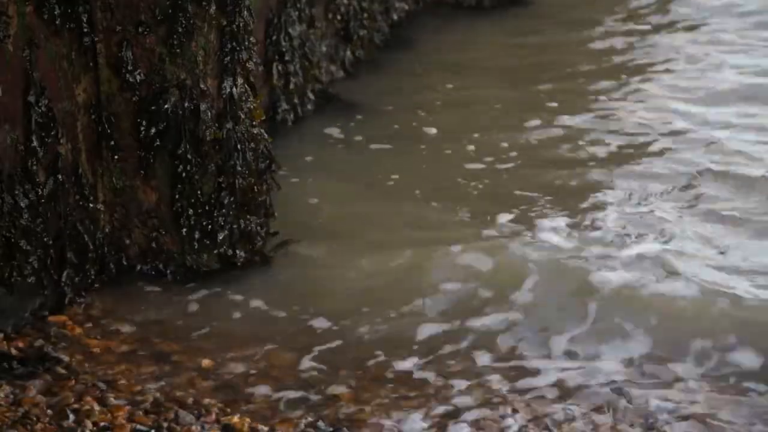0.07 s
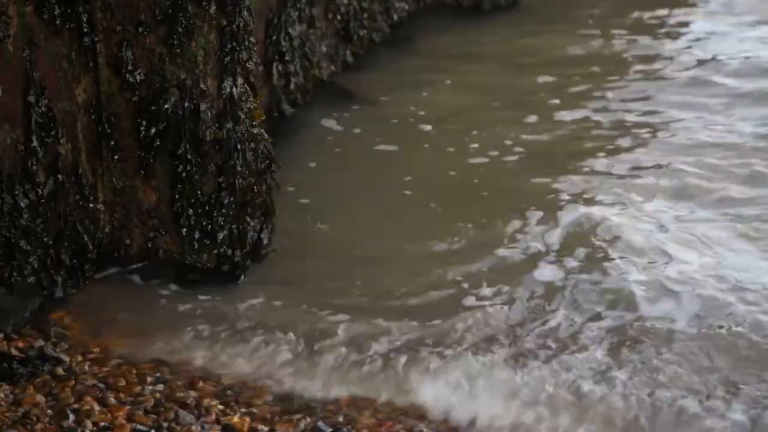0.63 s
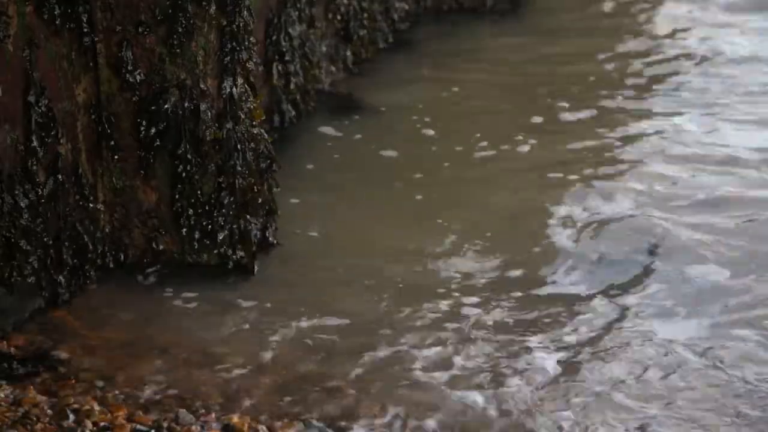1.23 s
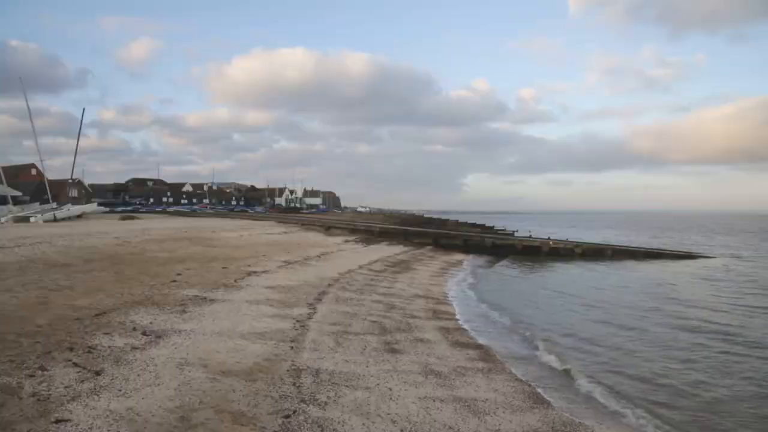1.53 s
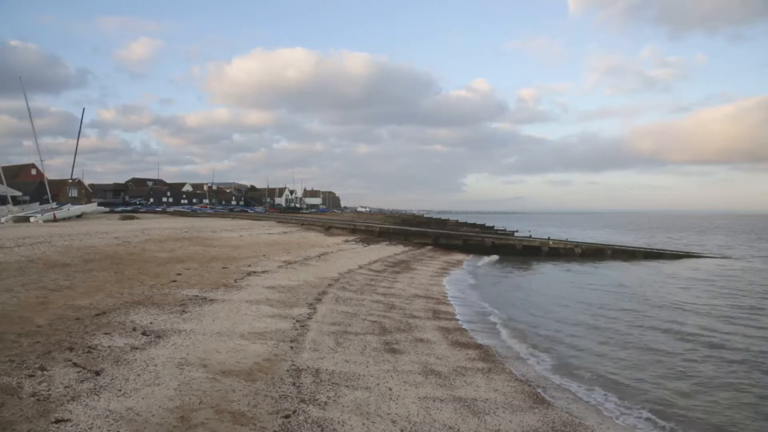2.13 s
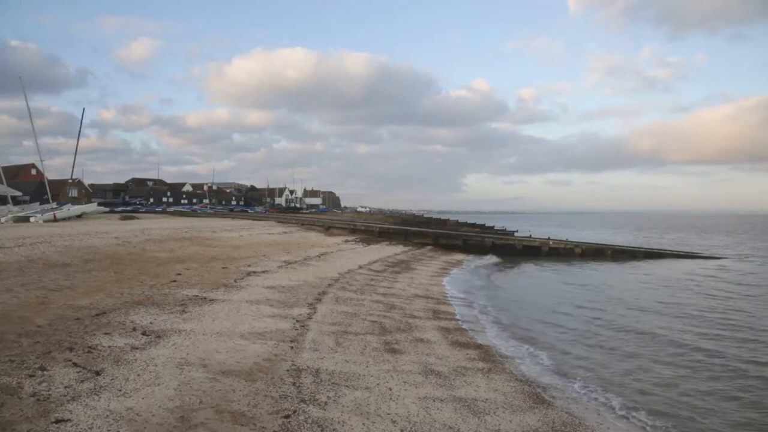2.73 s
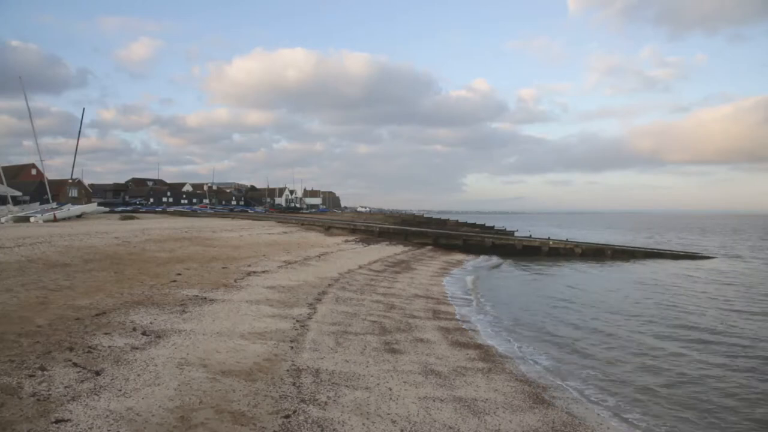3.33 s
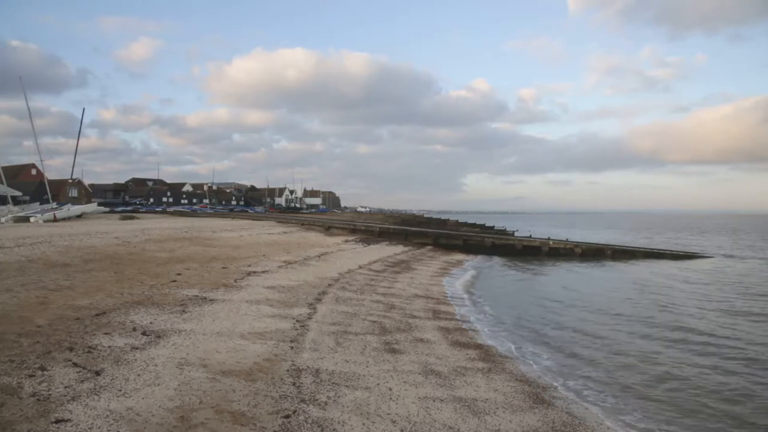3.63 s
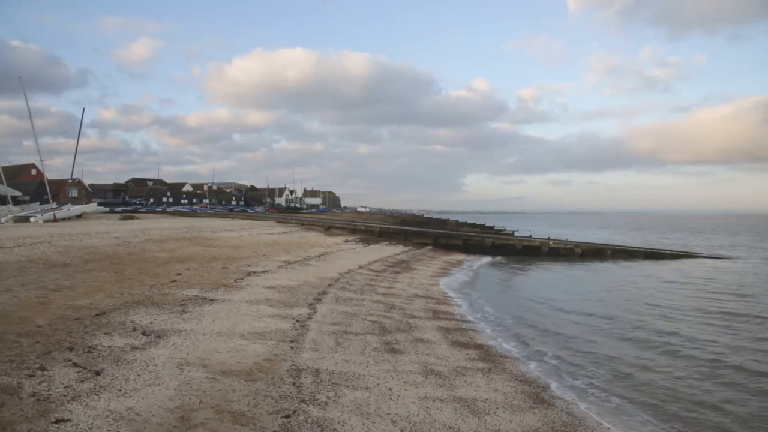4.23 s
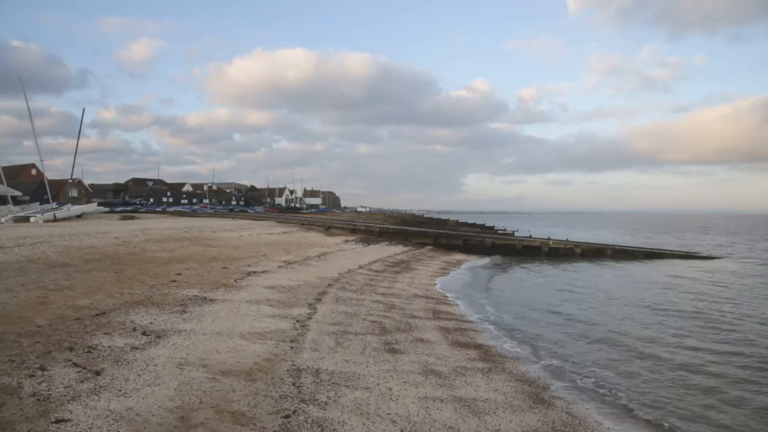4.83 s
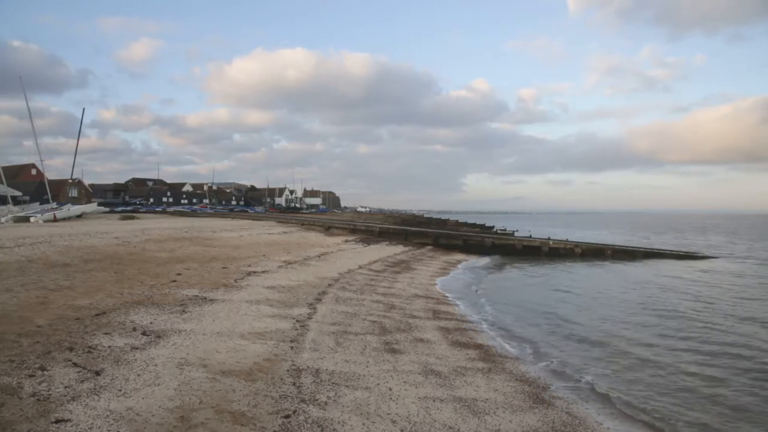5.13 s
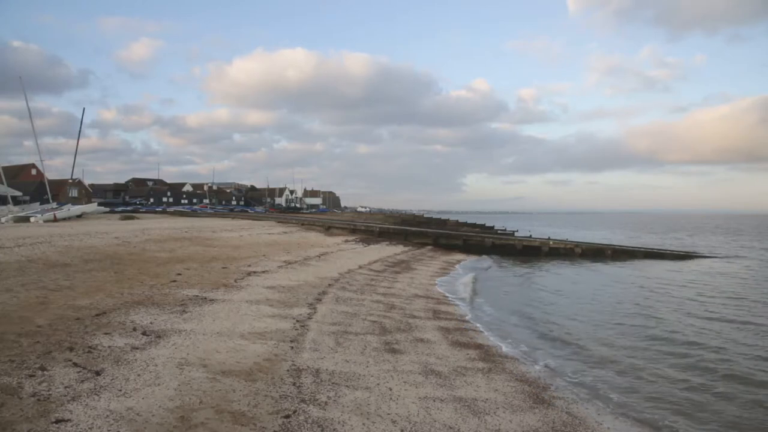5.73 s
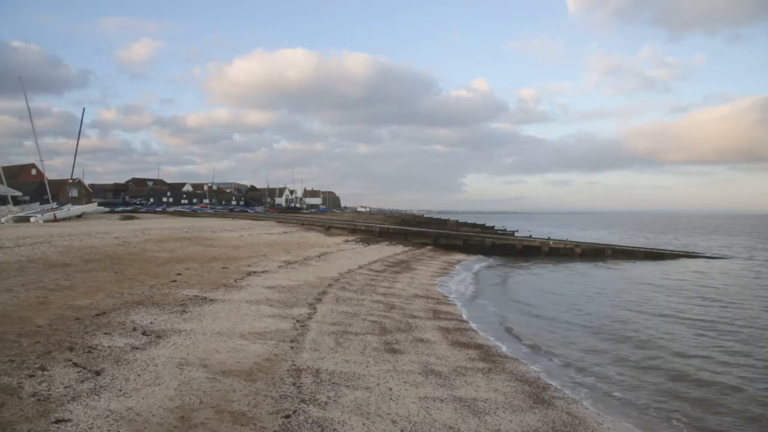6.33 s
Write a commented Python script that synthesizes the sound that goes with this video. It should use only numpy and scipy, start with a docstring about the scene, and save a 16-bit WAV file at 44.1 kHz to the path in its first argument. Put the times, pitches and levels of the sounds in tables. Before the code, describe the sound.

A small wave breaks and fizzes against a wooden breakwater, then ripples lap a pebble beach in light wind until another wave spills.

```python
"""Small sea waves on a pebble beach. First one breaks beside a wooden breakwater: foam fizzes, bubbles wash in,
air pockets churn and gulp, and the sound fades out. It fades in on the open shore, where ripples lap and plop,
pebbles rattle and light gusts buffet the microphone, until a second wave spills over the shingle. The water
sounds chiefly by bubble resonance: trapped air rings as a damped oscillator, the lower the larger the bubble."""
import sys
import numpy as np
from scipy import signal
from scipy.fft import rfft, irfft, next_fast_len
from scipy.io import wavfile
from scipy.ndimage import uniform_filter1d

SR = 44100
rng = np.random.default_rng(int(sys.argv[2]) if len(sys.argv) > 2 else 0)


def to_wav(s):
    """Save 16-bit WAV."""
    ch = np.atleast_2d(s).T  # columns
    pcm = np.round(np.clip(ch, -1, 1) * 32767)  # PCM
    wavfile.write(sys.argv[1], SR, pcm.astype(np.int16))


N = 280917
TIME = np.arange(N) / SR
SCENE_CHANGE_S = 1.553   # the silent instant between breakwater and open shore

# spectral envelope of bursting foam: frequency_hz, gain_db
FOAM_SPECTRUM = [(900, -13), (2000, 4), (3100, 6.5), (4200, 2), (5500, -1), (7500, -4), (10000, -9),
                 (13000, -12.5), (15700, -15)]


def from_db(db):
    """Decibels to amplitude ratio."""
    return 10 ** (np.asarray(db) / 20)


def rms_one(x):
    """Normalisation to rms 1."""
    return x / np.sqrt(np.mean(x ** 2) + 1e-20)


def drift(rate):
    """Low-pass noise: a slow random fluctuation with rms near 1."""
    r = np.exp(-80 * np.pi * rate / SR)
    slow = signal.lfilter([1], [1, -2 * r, r * r], rng.standard_normal(N // 40 + 2002))[2000:]
    return np.interp(np.arange(N) / 40, np.arange(len(slow)), rms_one(slow))


def coloured(x, spectrum):
    """Minimum-phase filtering imposes a spectral envelope causally; rms 1."""
    size = 2 * next_fast_len(N)
    hz, db = np.transpose(spectrum)
    bins_hz = np.maximum(np.arange(size // 2 + 1) * SR / size, 1)
    gain = from_db(np.interp(np.log(bins_hz), np.log(hz), db))
    cepstrum = irfft(np.log(gain))
    response = np.exp(2 * rfft(cepstrum[:size // 2], size))
    return rms_one(irfft(rfft(x, size) * response)[:N])


def evened(x, seconds):
    """Division by the running rms steadies the level and keeps the finer grain."""
    power = np.abs(uniform_filter1d(x ** 2, max(int(seconds * SR), 2)))
    return x / np.sqrt(power + 1e-12)


def resonance(x, hz, width_hz):
    """A damped oscillator: two poles, gain 1 at the peak."""
    r = np.exp(-np.pi * width_hz / SR)
    feedback = [1, -2 * r * np.cos(2 * np.pi * hz / SR), r * r]
    return signal.lfilter(np.array([1, 0, -1]) * (1 - r * r) / 2, feedback, x + 1e-18)


def impulses(per_s, spread_db):
    """A Poisson process of clicks, many small and a few large."""
    sizes = from_db(spread_db * np.minimum(rng.exponential(1, N), 4.5))
    return sizes * rng.choice([-1, 1], N) * (rng.random(N) < per_s / SR)


def bubbles(clicks, low_hz, high_hz, q, count=24):
    """Minnaert resonance: each click rings one bubble, whose random size sets its pitch; rms 1."""
    size_class = rng.integers(0, count, N)
    pitches = np.geomspace(low_hz, high_hz, count)
    return rms_one(sum(resonance(clicks * (size_class == k), hz, hz / q) for k, hz in enumerate(pitches)))


def water(grains, spectrum, blur_db, flutter_db, flutter_rate):
    """Superposition: near grains over the Gaussian blur of far ones, fluttering as the water tumbles."""
    near = rms_one(evened(grains, seconds=0.66))
    far = from_db(blur_db) * rng.standard_normal(N)
    steady = evened(coloured(near + far, spectrum), seconds=0.12)
    return steady * from_db(flutter_db * drift(flutter_rate))


def far_sea():
    """Incoherent addition: surf along the rest of the shore merges into a steady hush."""
    # spectral envelope of distant surf: frequency_hz, gain_db
    spectrum = [(40, 20), (100, 7), (200, 8.5), (400, -4), (1000, -33.5), (2000, -22), (3100, -6),
                (4200, -31), (8000, -26), (15700, -22)]
    return from_db(-53) * coloured(rng.standard_normal(N), spectrum)


def wind(breeze_db):
    """Turbulence: slow eddies press on the microphone, in smooth gusts over a light breeze."""
    # Gaussian puffs of wind: peak_s, level_db, half_width_s
    gusts = [(1.9, -42, .04), (2.06, -40, 0.075), (2.47, -39, 0.082), (2.949, -34.5, 0.15),
             (3.86, -34, 0.1), (4.04, -37, 0.11), (5.02, -45, 0.098), (5.57, -32, 0.043),
             (5.75, -31.5, 0.11), (6.049, -33.5, 0.059), (6.28, -31.5, 0.073)]
    # spectral envelope of the eddy pressure: frequency_hz, gain_db
    spectrum = [(3, -18.5), (7, 5), (14, 2), (26, -7.5), (40, -9), (55, -7.5), (80, -29), (200, -48.5),
                (600, -59.5)]
    puffs = sum(from_db(db) * np.exp(-((TIME - s) / width) ** 2) for s, db, width in gusts)
    eddies = coloured(rng.standard_normal(N), spectrum)
    steady = eddies / np.abs(signal.hilbert(eddies))   # constant envelope
    rumble = signal.sosfilt(signal.butter(3, 55, fs=SR, output="sos"), steady)
    return np.hypot(from_db(breeze_db), puffs) * rms_one(rms_one(rumble) + eddies)


def surge(layer, lag_s, rise_s, drop_db, fall_db_per_s, calm_db):
    """Powers add: one surf layer's level in dB as each wave builds, tumbles, collapses and drains."""
    # breaking waves: break_s, tumble_s, churn_db, wash_db, foam_db
    waves = [(0.098, 0.37, -28.5, -30, -33), (2.051, 0.082, -58, -54, -54.5),
             (2.27, 0.21, -64.5, -61, -53.5), (2.66, .4, -75, -61, -52.5), (3.239, 0.049, -48.5, -45, -63),
             (3.52, 0.092, -74, -47.5, -57), (4.88, .1, -57, -59, -67), (5.291, 0.25, -39, -38.5, -44.5)]
    collapse_s = 0.27
    power = from_db(calm_db) ** 2
    for s, tumble_s, *levels_db in waves:
        db = levels_db[("churn", "wash", "foam").index(layer)]
        before, after = np.maximum(s + lag_s - TIME, 0), np.maximum(TIME - s - tumble_s, 0)
        build = 1 / (1 + (before / rise_s) ** 1.44)
        ebb = from_db(-drop_db * (1 - np.exp(-after / collapse_s)) - fall_db_per_s * after)
        drain_s = 0.09 + 3.63 * tumble_s   # the backwash sinks into the shingle
        drain = 1 / (1 + (after / drain_s) ** 6)
        same_place = (TIME < SCENE_CHANGE_S) == (s < SCENE_CHANGE_S)
        power = power + (from_db(db) * build * ebb * drain * same_place) ** 2
    return 10 * np.log10(power)


def foam(level_db):
    """Shot noise: tiny bubbles burst and small pebbles tick in the backwash."""
    fizz = bubbles(impulses(per_s=2200, spread_db=4.5), low_hz=2590, high_hz=13700, q=12)
    ticks = from_db(-4) * rms_one(impulses(per_s=1400, spread_db=8.5))
    hiss = water(fizz + ticks, FOAM_SPECTRUM, blur_db=7, flutter_db=0.78, flutter_rate=28)
    return from_db(level_db) * hiss


def sparkle(foam_db):
    """Lightly damped resonance: the nearest foam bubbles pop with tiny, clear pings."""
    rings = bubbles(impulses(per_s=420, spread_db=4), low_hz=3230, high_hz=14900, q=50, count=48)
    return from_db(foam_db - 14) * evened(coloured(rings, FOAM_SPECTRUM), seconds=0.5)


def wash(level_db):
    """Impulse excitation: the stronger the flow, the more bubbles ring and splashes click each second."""
    # spectral envelope of rushing water: frequency_hz, gain_db
    spectrum = [(150, -10), (400, -2), (700, -1), (1000, -1), (1500, 0), (2200, -2), (3200, -2),
                (4200, -11), (6500, -21.5), (14000, -59)]
    per_s = 1300 * from_db(0.5 * (level_db + 51))
    rings = bubbles(impulses(per_s, spread_db=1.5), low_hz=491.5, high_hz=4900, q=11.8)
    splashes = from_db(-3.5) * rms_one(impulses(per_s, spread_db=3))
    rush = water(rings + splashes, spectrum, blur_db=0.5, flutter_db=1.25, flutter_rate=2.37)
    return from_db(level_db) * rush


def gurgles(wash_db):
    """Masking: larger bubbles ring at the water's edge, but a big wave drowns their pitches."""
    rings = bubbles(impulses(per_s=270, spread_db=2), low_hz=291, high_hz=2465, q=8.4, count=40)
    return from_db(0.57 * wash_db - 28.5) * evened(rings, seconds=0.44)


def churn(level_db):
    """Air entrainment: the breaker folds in countless pockets that ring low and merge into a roar."""
    # spectral envelope of the roar: frequency_hz, gain_db
    spectrum = [(50, -19), (90, -7.5), (135, -6), (190, -0.5), (265, -2.5), (340, -2.5), (540, -3),
                (850, -6.5), (1400, -11), (3000, -65)]
    pockets = bubbles(impulses(per_s=1200, spread_db=2.5), low_hz=114.3, high_hz=1114.5, q=22.7)
    return from_db(level_db) * water(pockets, spectrum, blur_db=7.5, flutter_db=1.76, flutter_rate=16)


def gulps(rise_s, t60_s):
    """Volume pulsation: large air pockets ring briefly under water, wobbling as they rise."""
    # trapped air pockets: start_s, level_db, pitch_hz
    pockets = [(0.275, -25, 177), (0.376, -25.5, 175), (0.521, -29, 125.4), (0.567, -33.5, 89.5),
               (0.763, -36, 190), (3.229, -44, 216), (3.661, -41.5, 192), (4.092, -38, 213),
               (4.124, -40.5, 146), (4.145, -44, 115), (5.436, -26.5, 269)]
    out, wobble = np.zeros(N), 0.9 * drift(45)
    for s, db, hz in pockets:
        t = np.maximum(TIME - s, 0)
        swell = 2 * (1 - np.exp(-t / rise_s)) * from_db(db - 60 * np.minimum(t / t60_s, 3))
        out += swell * np.sin(2 * np.pi * hz * t + wobble)
    return out


def drips(wash_db, count, low_hz=1240, high_hz=3560):
    """Uniformly random faint drops that follow the wash's level: rows of start_s, level_db, pitch_hz."""
    when, size, pitch = rng.random((count, 3)).T
    start_s = when * TIME[-1]
    level_db = np.interp(start_s, TIME, wash_db) + 7.5 + 5 * (2 * size - 1)
    return list(zip(start_s, level_db, low_hz * (high_hz / low_hz) ** pitch))


def plops(faint_drops, rise_s, crack_t60_s, spray_t60_s):
    """Impact and free decay: a drop cracks on the surface, rings a bubble and throws a little spray."""
    # the loudest drops and bursting bubbles, with two bright pebble ticks near 8.6 and 9.7 kHz: start_s,
    # level_db, pitch_hz
    loud_drops = [(0.7149, -15.5, 2080), (1.640, -31, 3210), (1.9291, -32, 2100), (2.1808, -34, 1480),
                  (2.3217, -29, 2340), (2.4584, -25.5, 2500), (2.4848, -28.5, 3000), (2.5754, -30, 2670),
                  (2.640, -27.5, 1400), (2.6739, -37, 2860), (2.7568, -29, 2700), (3.9328, -25, 3000),
                  (3.952, -28, 2820), (4.2866, -28.5, 2430), (4.2868, -40, 8650), (4.6446, -31.5, 1950),
                  (4.7026, -39, 1790), (4.9872, -21.5, 770), (5.4972, -20, 550), (5.727, -30, 9700)]
    out, t = np.zeros(N), TIME[:SR // 8]
    for s, db, hz in loud_drops + faint_drops:
        band = signal.butter(2, [0.6 * hz, min(1.8 * hz, 0.45 * SR)], "band", fs=SR, output="sos")
        hiss = rms_one(signal.sosfilt(band, rng.standard_normal(len(t))))
        ring_t60_s = 0.013 * (2000 / hz) ** 0.3   # larger bubbles ring longer
        rising_tone = np.sin(2 * np.pi * hz * t * (1 + 2 * t))
        ring = rising_tone * from_db(-1 - 60 * t / ring_t60_s)
        splash = from_db(-22 - 60 * t / spray_t60_s) + from_db(-1.5 - 60 * t / crack_t60_s)
        drop = from_db(db) * (1 - np.exp(-t / rise_s)) * (ring + 0.5 * splash * hiss)
        at = round(s * SR)
        out[at:at + len(t)] += drop[:N - at]
    return out


def rattles(edge_s):
    """Impact noise: stones roll over one another in short flurries of clicks."""
    # flurries of shifting pebbles: start_s, level_db, length_s
    flurries = [(2.464, -53, 0.014), (2.569, -48.5, 0.027), (2.635, -47.5, 0.065), (3.931, -39.5, 0.015),
                (3.949, -39.5, 0.0069), (4.595, -48.5, 0.044), (4.699, -48, 0.011)]
    # spectral envelope of colliding pebbles: frequency_hz, gain_db
    spectrum = [(150, -12), (500, -13), (1100, -1), (2000, 0), (3000, -3), (5800, -12), (8000, -21.5),
                (10500, -25), (15000, -40)]
    clicks = evened(coloured(impulses(per_s=2400, spread_db=4), spectrum), seconds=0.0047)
    envelope = np.zeros(N)
    for s, db, length_s in flurries:
        inside_s = np.minimum(TIME - s, s + length_s + edge_s - TIME)
        envelope += from_db(db) * np.clip(inside_s / edge_s, 0, 1)
    return clicks * envelope


def spray():
    """Dense shot noise: tiny droplets thrown off a curling crest patter down as a thin, bright hiss."""
    # Gaussian showers of spray: peak_s, level_db, half_width_s
    showers = [(3.25, -58, 0.18), (4.61, -62, 0.03), (5.26, -70, 0.045)]
    # spectral envelope of droplet impacts: frequency_hz, gain_db
    spectrum = [(3000, -20), (7000, 9), (11000, 4), (15700, -2)]
    droplets = evened(coloured(impulses(per_s=11000, spread_db=6), spectrum), seconds=0.1)
    return droplets * sum(from_db(db) * np.exp(-((TIME - s) / width) ** 2) for s, db, width in showers)


def scene():
    """Superposition of all sources, with a fade through silence between the two places."""
    # the lip fizzes just before the crest breaks; air is folded in just after
    foam_db = surge("foam", lag_s=-0.08, rise_s=0.042, drop_db=8.5, fall_db_per_s=3.5, calm_db=-57.5)
    wash_db = surge("wash", lag_s=0, rise_s=0.085, drop_db=2, fall_db_per_s=9.5, calm_db=-63)
    churn_db = surge("churn", lag_s=0.071, rise_s=0.14, drop_db=7, fall_db_per_s=17.5, calm_db=-67.5)
    surf = churn(churn_db) + wash(wash_db) + gurgles(wash_db) + foam(foam_db) + sparkle(foam_db) + spray()
    drops = plops(drips(wash_db, count=45), rise_s=0.0005, crack_t60_s=0.009, spray_t60_s=0.06)
    lapping = drops + gulps(rise_s=0.0067, t60_s=0.11) + rattles(edge_s=0.0018)
    fade_out = np.clip((SCENE_CHANGE_S - TIME) / 1.033, 0, 1)
    fade_in = np.clip((TIME - SCENE_CHANGE_S) / 0.28, 0, 1)
    return ((fade_out + fade_in) * (surf + lapping + wind(breeze_db=-50) + far_sea()))[None]


def record(dry):
    """The microphone's frequency response: a presence hump near 3 kHz and a steep cut at the top."""
    hump = from_db(-8.5) * resonance(dry, hz=2914, width_hz=480)
    hump += from_db(-13.5) * resonance(dry, hz=3120, width_hz=260)
    top_cut = signal.ellip(12, 0.1, 80, 15700, fs=SR, output="sos")
    return signal.sosfilt(top_cut, dry + hump)


dry = scene()
out = record(dry)
to_wav(out)
```